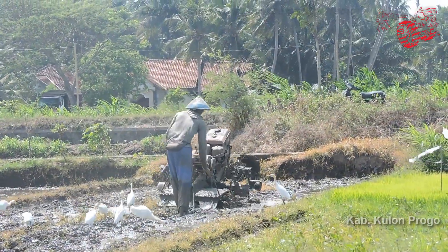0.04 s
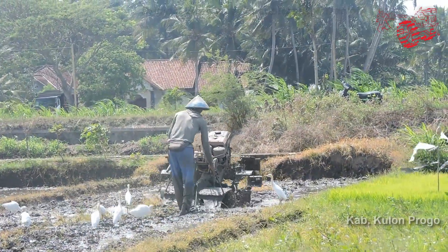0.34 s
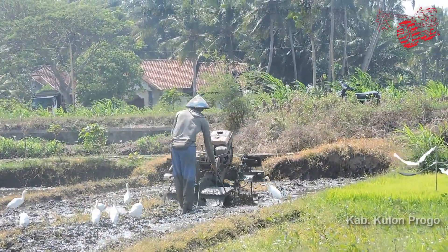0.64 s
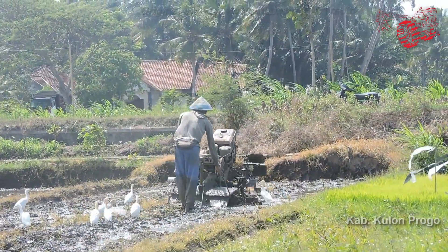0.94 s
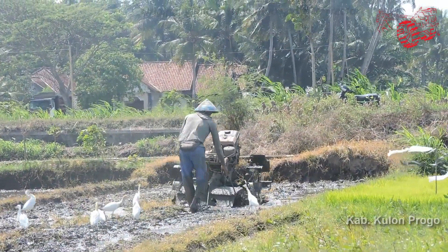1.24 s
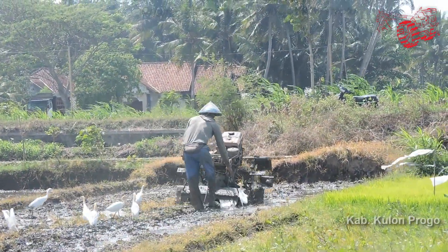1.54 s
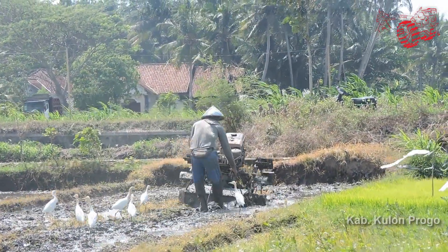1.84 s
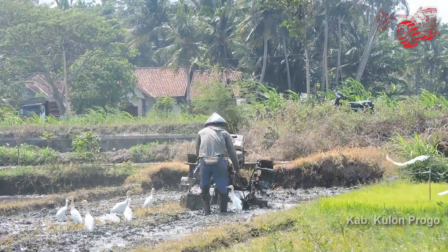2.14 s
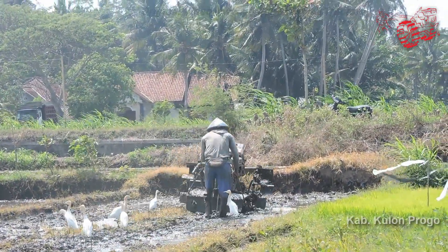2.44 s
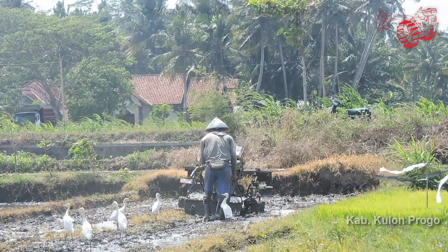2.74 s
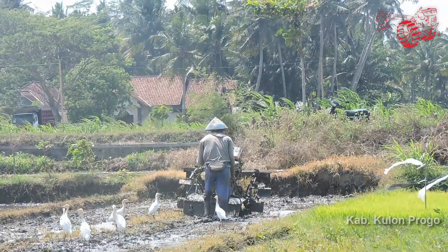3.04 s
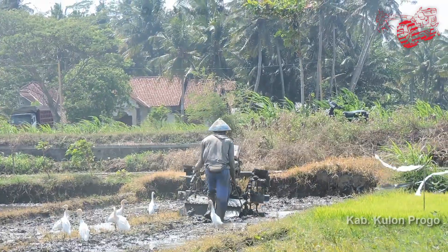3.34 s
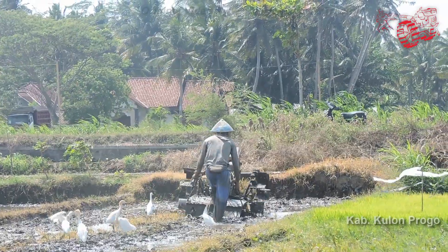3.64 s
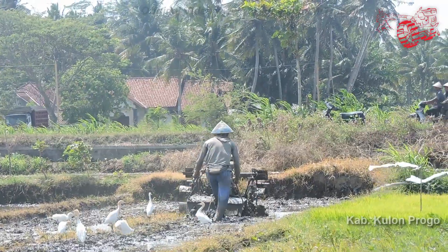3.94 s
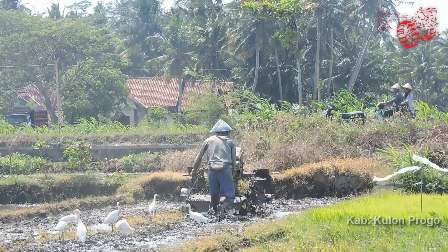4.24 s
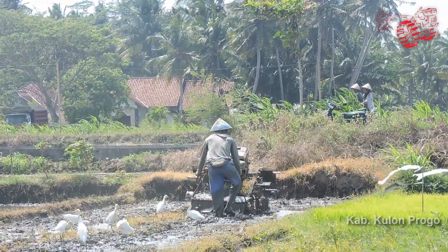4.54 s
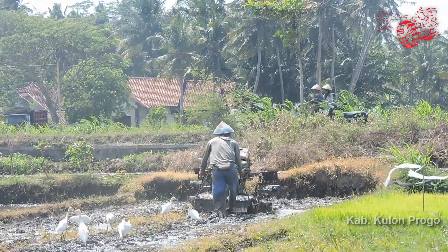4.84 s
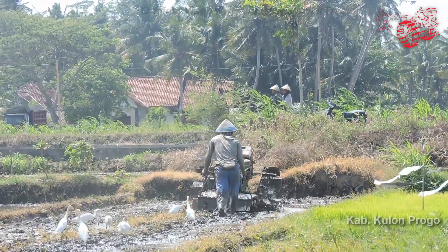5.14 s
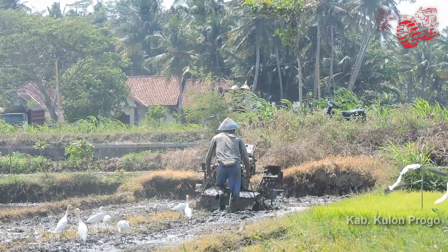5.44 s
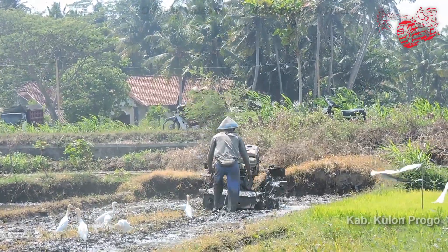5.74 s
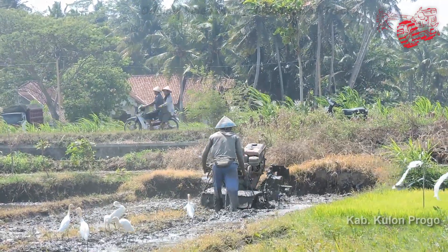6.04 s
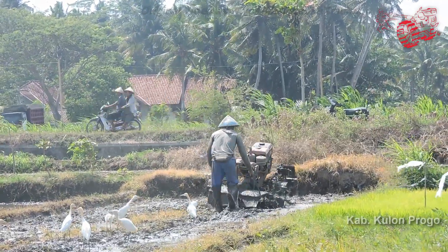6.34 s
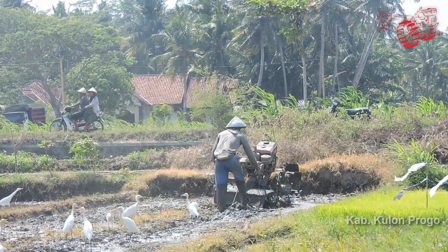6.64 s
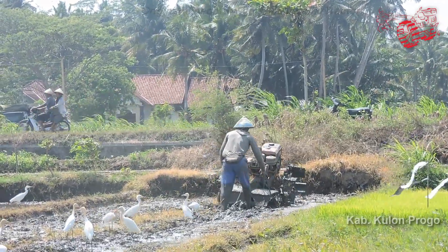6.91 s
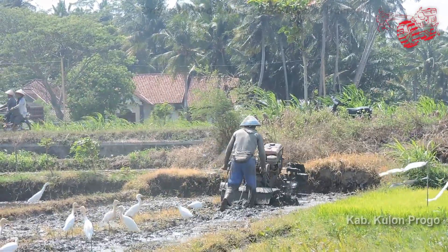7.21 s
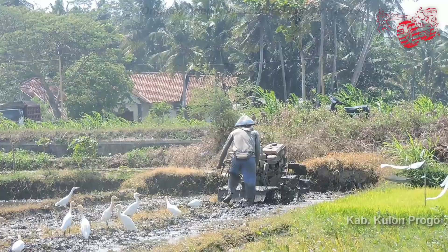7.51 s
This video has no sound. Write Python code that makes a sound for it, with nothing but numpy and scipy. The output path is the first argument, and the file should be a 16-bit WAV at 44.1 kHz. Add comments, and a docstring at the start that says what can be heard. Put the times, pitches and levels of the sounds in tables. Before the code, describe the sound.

Steady chugging and metallic rattling from a small diesel tractor tilling a muddy field, speeding up slightly, while another engine thuds far off.

```python
"""From the start, a breeze rumbles on the microphone while a two-wheel tractor clatters and sprays mud in a
wet rice field, and a second diesel thuds far off. Each cycle of the tractor's one-cylinder diesel is a
knock, an exhaust puff with a sharp crack, then a gulp of air; palms and banks echo the thuds.
The mud's drag swells knock, clatter and spray together. From about 3 s the tractor speeds up and knocks
harder; around 5 s the far engine slows, and just after 7 s the mud drags hardest."""
import sys
import numpy as np
from scipy import signal
from scipy.fft import rfft, irfft, next_fast_len
from scipy.io import wavfile
from scipy.ndimage import map_coordinates

SR = 44100
rng = np.random.default_rng(int(sys.argv[2]) if len(sys.argv) > 2 else 0)


def unload_wav(signal):
    """Save mono or channel-first audio to the path in sys.argv[1] as 16-bit WAV at rate SR, clipped to [-1, 1]."""
    wavfile.write(
        sys.argv[1],
        SR,
        np.round(np.clip(np.atleast_2d(signal).T, -1, 1) * 32767).astype(np.int16),
    )


N = 338247
TIME = np.arange(N) / SR
LOW_SPEED_PER_S = 15  # "extra speed" below means firings per second above this

# tone of gears, tines (the digging blades) and mud: (frequency [Hz], level [dB])
CLATTER_SPECTRUM = [(400, 1.5), (600, -1), (1000, -0.5), (1180, -6), (1450, 3), (2000, 1.5), (2400, 1),
                    (2900, 2), (3500, -4), (4100, -8.5), (4800, -6.5), (7500, -13.5), (10000, -20.5),
                    (12500, -27), (15500, -54)]
# how quickly splashes and pitch flutter: (flutter rate [Hz], level [dB])
FLUTTER_SPECTRUM = [(2, 4), (4, 8), (8, 8), (30, -12), (200, -35), (1000, -90)]


def from_db(db):
    """Turn decibels into a factor to multiply by."""
    return 10 ** (np.asarray(db) / 20)


def rms_one(x):
    """Scale a signal so that its average size (rms) is 1."""
    return x / np.sqrt(np.mean(x ** 2) + 1e-20)


def in_time(rows):
    """Each column of a table over time, as one value per sample."""
    seconds, *columns = np.transpose(rows)
    return [np.interp(TIME, seconds, column) for column in columns]


def noise(spectrum, channels=1):
    """Unrelated noises with the given spectrum; rms 1."""
    hz, db = np.transpose(spectrum)
    size = next_fast_len(N)
    grid = np.maximum(np.fft.rfftfreq(size, 1 / SR), 1)
    low_cut = np.minimum(grid / hz[0], 1) ** 2
    gain = low_cut * from_db(np.interp(np.log(grid), np.log(hz), db))
    white = rng.standard_normal((channels, size))
    return rms_one(irfft(rfft(white) * gain, size)[:, :N])


def resonance(x, hz, width_hz):
    """Ring at one pitch; a smaller width rings longer."""
    r = np.exp(-np.pi * width_hz / SR)
    feedback = [1, -2 * r * np.cos(2 * np.pi * hz / SR), r * r]
    return signal.lfilter(np.array([1, 0, -1]) * (1 - r * r) / 2, feedback, x)


def pan(x, left_db):
    """Make the left side louder than the right by left_db."""
    return x * from_db(np.array([[.5], [-.5]]) * left_db)


def crank(speed, start_cycle):
    """A turning engine: cycles done so far, and firings per second."""
    rate, = in_time(speed)
    return start_cycle + np.cumsum(rate) / SR, rate


def stroke(engine, share, spread_db, jitter_ms):
    """Time in ms from the nearest pass of a point (share) in the cycle, and that pass's random strength."""
    cycles, rate = engine
    nearest = np.round(cycles - share)
    chance = rng.standard_normal((200, 2))[nearest.astype(int) + 2]
    ms = 1000 * (cycles - share - nearest) / rate
    return ms + jitter_ms * chance[:, 0], from_db(spread_db * chance[:, 1])


def burst(engine, share, rise_ms, decay_ms, spread_db, jitter_ms):
    """Rise and fall of a blow that comes once a cycle; rms 1."""
    ms, strength = stroke(engine, share, spread_db, jitter_ms)
    return rms_one(strength * np.exp(np.minimum(ms, 0) / rise_ms - np.maximum(ms, 0) / decay_ms))


def effort_db(engine, base_db, per_load, per_speed):
    """Level of a sound that follows the mud's drag and the engine's extra speed."""
    # load on the engine as the tines bite and slip: (time [s], load [dB])
    load = [(0, -4), (.29, -5), (.56, -1.5), (.93, -4), (1.16, -2.5), (2.05, -2.5), (2.42, -0.9),
            (2.63, -3.5), (3.45, -3), (3.66, 0), (3.97, -3), (4.27, -4), (4.5, -1), (5.05, -2), (7.0, -0.4),
            (7.27, 3), (7.52, -2.3), (7.67, 0)]
    return base_db + per_load * in_time(load)[0] + per_speed * (engine[1] - LOW_SPEED_PER_S)


def steel_ring(force, modes, engine):
    """A struck steel part rings at its own pitches (modes), in a new mix each firing."""
    out = np.zeros(N)
    for k, (hz, width_hz, db, per_speed_db) in enumerate(modes):
        _, strength = stroke(engine, share=.8, spread_db=1.4, jitter_ms=0)
        gain = strength * from_db(db + per_speed_db * (engine[1] - LOW_SPEED_PER_S))
        out += (-1) ** k * resonance(gain * force, hz, width_hz)
    return rms_one(out)


def thuds(engine, puffs, booms, spread_db, jitter_ms):
    """Each gas puff swings the air pressure both ways and makes pipe and silencer boom."""
    pulses = np.zeros(N)
    for share, pressure, width_ms in puffs:
        ms, strength = stroke(engine, share, spread_db, jitter_ms)
        pulses += pressure * strength * ms / width_ms * np.exp(-.5 * (ms / width_ms) ** 2)
    return pulses + sum(from_db(db) * resonance(pulses, hz, width) for hz, width, db in booms)


def wind():
    """A breeze buffets the microphone in slow gusts."""
    # how quickly the gusts change: (rate [Hz], level [dB])
    gusting = [(1, 39), (4, -30), (12, -36), (60, -90)]
    # tone of the breeze: (frequency [Hz], level [dB])
    spectrum = [(12, -12), (22, -2.5), (54, 1), (112, -2.5), (300, -15), (430, -19), (600, -62),
                (2000, -54)]
    gusts = from_db(1.2 * noise(gusting, channels=2))
    return pan(from_db(-27.2) * gusts * noise(spectrum, channels=2), left_db=-2.8)


def rumble():
    """A steady low noise lies under the engines."""
    # tone of the rumble: (frequency [Hz], level [dB])
    spectrum = [(25, -24), (60, -7), (110, -5.5), (170, -0.5), (260, -3), (315, -1.5), (360, -5.5),
                (430, -5), (560, -19), (900, -17.5), (3000, -63)]
    return from_db(-34.5) * noise(spectrum)[0]


def clatter(engine):
    """Gears, tines and mud make a grainy wash that swells each firing; loose parts tick on the frame."""
    # ringing of frame and mudguards: (pitch [Hz], width [Hz], level [dB], change per extra speed [dB])
    frame_modes = [(935, 25, 0, 1.3), (1430, 145, 0, -0.5), (1788, 33, 4, .5), (1965, 24, 1.5, 2),
                   (2220, 33, -9.5, 0.5), (2756, 160, -2.5, -1)]
    swell = 0.5 + 0.17 * burst(engine, share=0.1, rise_ms=16, decay_ms=8.3, spread_db=4, jitter_ms=1.3)
    ticks = (rng.random(N) < 350 / SR) * rng.standard_normal(N)
    wash = from_db(-.5) * noise(CLATTER_SPECTRUM)[0]
    ringing = from_db(-4.5) * steel_ring(ticks, frame_modes, engine)
    return rms_one(swell) * (wash + ringing)


def clinks(per_s=90, low_hz=2600, high_hz=8000, pitches=14):
    """Grit and loose fittings tick at random on the steel wheels and tines."""
    out = np.zeros(N)
    for hz in np.geomspace(low_hz, high_hz, pitches):
        hits = rng.random(N) < per_s / pitches / SR
        strength = from_db(4 * np.clip(rng.standard_normal(N), -2, 2))
        out += resonance(hits * strength + 1e-18, hz, width_hz=110) * low_hz / hz
    return rms_one(out)


def spray(engine):
    """Wet mud flies off the wheels and tines in uneven splashes, spread wide."""
    # bigger throws of mud: (time [s], half length [s], level change [dB])
    clods = [(0.727, .06, 8.5), (1.196, 0.061, 7), (2.29, 0.072, 6), (7.28, .12, -0.5)]
    # hiss of flying mud: (frequency [Hz], level [dB])
    spectrum = [(2000, -8), (4500, -1), (5400, -3.5), (6500, 3), (7600, -3), (8800, -1.5), (9500, -3),
                (10500, -.7), (12000, -6), (14000, -9), (15000, -14), (16000, -22)]
    clods_db = sum(db * np.exp(-((TIME - s) / length) ** 2) for s, length, db in clods)
    splashes = from_db(1.7 * noise(FLUTTER_SPECTRUM)[0] + clods_db)
    level = from_db(effort_db(engine, base_db=-50, per_load=.88, per_speed=-.6))
    return level * splashes * noise(spectrum, channels=2)


def far_engine():
    """Only the thuds of the second diesel carry this far."""
    # its speed: (time [s], firings [per s])
    speed = [(0.0, 20.997), (0.58, 20.708), (1.35, 20.811), (2.38, 20.647), (2.75, 21.485), (3.07, 22.063),
             (3.5, 21.381), (3.96, 20.689), (4.5, 20.81), (4.94, 20.864), (5.3, 19.612), (5.66, 18.216),
             (6.2, 18.021), (6.79, 17.666), (7.67, 17.833)]
    # its gas puffs: (point in cycle [0-1], pressure [relative], half width [ms])
    puffs = [(.006, -.45, 1.08), (.013, .19, 1.55), (.274, -.173, 1.12), (.55, .036, 2.5),
             (.713, .097, 1.25)]
    # booms of its exhaust: (pitch [Hz], width [Hz], level [dB])
    booms = [(154, 15, -3.5), (253, 33, -6.7), (305, 12, -.6), (423, 12, -3.9)]
    # its loudness through the trees: (time [s], level [dB])
    level = [(0, 1.5), (1.2, 2.5), (1.8, 0.1), (2.5, 2), (3.2, 1.5), (4, -2), (4.7, 1), (5.8, -1.3),
             (6.6, -1.5), (7.67, -2)]
    engine = crank(speed, start_cycle=.515)
    return thuds(engine, puffs, booms, spread_db=.5, jitter_ms=.04) * from_db(in_time(level)[0])


def knock(engine):
    """Burning fuel hammers the block a quarter cycle before the exhaust; piston and bearings slap next."""
    # metal hitting metal: (point in cycle [0-1], level [dB], timing scatter [ms])
    contacts = [(.722, -8, .05), (.740, 0, .05), (.765, -9, .3), (.80, -12, .6), (.865, -11, .8)]
    # ringing of block, hood and tank: (pitch [Hz], width [Hz], level [dB], change per extra speed [dB])
    block_modes = [(946, 49, 6, -1.3), (1019, 114, -2, 2), (1390, 29, 6.5, -1.5), (1606, 140, 1.5, -0.5),
                   (1788, 40, 6, 0.3), (1954, 55, -2.5, 2.5), (2205, 85, 0, 1.5), (2810, 130, 6, 1),
                   (3043, 78, 7, 0.5), (3750, 480, -18, 6)]
    # rasp of the knock: (frequency [Hz], level [dB])
    rasp = [(400, 17), (700, 0), (1200, 3.5), (1600, 6), (3200, 15.5), (4100, 7.5), (6500, 1),
            (10000, -6.5), (12500, -9), (15500, -35)]
    taps = np.zeros(N)
    for share, db, scatter_ms in contacts:
        ms, strength = stroke(engine, share, spread_db=.7, jitter_ms=scatter_ms)
        taps += from_db(db) * strength * np.exp(-.5 * (ms / 0.044) ** 2)
    blow = burst(engine, share=.738, rise_ms=1.0, decay_ms=5.5, spread_db=1.2, jitter_ms=.3)
    force = rms_one(taps) + from_db(-5.5) * blow * rng.standard_normal(N)
    return from_db(-6) * steel_ring(force, block_modes, engine) + from_db(-12) * blow * noise(rasp)[0]


def crack(engine):
    """The first jet of gas hisses through the exhaust valve; frame and wet ground scatter the sound."""
    # tone of the jet: (frequency [Hz], level [dB])
    spectrum = [(400, -1), (900, -6), (1500, 0), (3000, 0), (4500, -3), (7000, -2), (8500, -4.5),
                (10500, -4), (12000, -8), (14000, -8.5), (15000, -12), (16000, -20)]
    # loudness of the jet: (time [s], level [dB])
    level = [(0, 2), (.9, 0), (1.3, 1.5), (2.7, -2), (3.5, 2.5), (4.2, 0.5), (5, -4.5), (6, -2.5), (6.7, 1),
             (7.67, -3)]
    jet = burst(engine, share=.99, rise_ms=1.0, decay_ms=3.2, spread_db=2.4, jitter_ms=.4)
    hiss = from_tractor(noise(spectrum)[0]) + from_db(-3) * noise(spectrum, channels=2)
    return from_db(-12.5 + in_time(level)[0]) * jet * hiss


def tailpipe(engine):
    """Every jet of gas sets the pipe ringing at several pitches, each with a new strength."""
    # extra fuel sharpens the exhaust as the engine gathers speed: (time [s], fuel [0-1])
    fuel_curve = [(0, 0), (2.8, 0.44), (3.15, 1), (3.7, 0.89), (4.0, 0.96), (4.6, 0.19), (5.3, 0.19),
                  (7.67, 0)]
    # the pipe's bark:
    # (pitch [Hz], width [Hz], level [dB], change per extra speed [dB], change at full fuel [dB])
    bark = [(1462, 220, -15, 0.5, 7), (1880, 133, -22, 4, 9.5), (2846, 260, -10, -1.5, -4),
            (4610, 310, -17, 0.5, 1), (5680, 250, -29, 6, 16), (6840, 350, -17, -2.5, 10)]
    # a high ping that rises as the gas gets hotter: (time [s], pitch [Hz], level [dB])
    ping_curve = [(0, 5800, -12), (1.2, 5750, -18), (2.1, 5800, -13), (2.7, 5900, -16), (3.3, 6350, -6),
                  (4.5, 6200, -9), (5.4, 6100, -9), (6, 6000, -9), (6.6, 5900, -5), (7.1, 5950, -10),
                  (7.67, 6050, -12)]
    # a bright edge, heard once the pipe points at the listener: (time [s], pitch [Hz], level [dB])
    edge_curve = [(0, 3416, -22), (3.4, 3496, -10.5), (4.8, 3600, -11.5), (6, 3756, -7.5), (7.67, 3577, -8)]
    bark_share, ping_share = .995, .985  # points in the cycle
    ping_width_hz, ping_wander_hz, edge_width_hz = 230, 170, 720
    fuel, = in_time(fuel_curve)
    edge_hz, edge_db = in_time(edge_curve)
    ping_hz, ping_db = in_time(ping_curve)
    ping_hz += ping_wander_hz * noise(FLUTTER_SPECTRUM)[0]
    modes = [(bark_share, *mode) for mode in bark]
    modes.append((ping_share, ping_hz, ping_width_hz, ping_db, 0, 0))
    modes.append((bark_share, edge_hz, edge_width_hz, edge_db, 0, 0))
    out = np.zeros(N)
    for share, hz, width_hz, db, per_speed_db, per_fuel_db in modes:
        jet = burst(engine, share, rise_ms=.9, decay_ms=2, spread_db=1.4, jitter_ms=.3)
        swirl = rng.standard_normal(N) + 1j * rng.standard_normal(N)
        # smooth the noisy jet into a fading ring, then shift it up to its pitch
        ring = signal.lfilter([1], [1, -np.exp(-np.pi * width_hz / SR)], jet * swirl)
        ring = signal.sosfilt(signal.butter(2, 2 * width_hz, fs=SR, output="sos"), ring)
        phase = 2 * np.pi * np.cumsum(hz * np.ones(N)) / SR
        tone = rms_one(np.real(ring * np.exp(1j * phase)))
        out += tone * from_db(db + per_speed_db * (engine[1] - LOW_SPEED_PER_S) + per_fuel_db * fuel)
    return out


def exhaust(engine):
    """The near engine chugs as it puffs gas out and gulps air in."""
    # gas puffs: (point in cycle after the exhaust opens [0-1], pressure [relative], half width [ms])
    puffs = [(.001, .236, 1.26), (.153, .082, 1.85), (.224, -.029, .77), (.305, -.11, .87),
             (.576, -.066, 1.12)]
    # booms of pipe and silencer: (pitch [Hz], width [Hz], level [dB])
    booms = [(117, 17, -1.5), (156, 12, .5), (232, 44, -4), (303, 41, 6.7), (415, 46, 5.5)]
    # the exhaust swings toward the listener as the tractor turns: (time [s], level [dB])
    level = [(0, -0.1), (2.5, 0.1), (4, 0.4), (5.6, 0), (6.4, 1.9), (7.67, 1.1)]
    return thuds(engine, puffs, booms, spread_db=.9, jitter_ms=.08) * from_db(in_time(level)[0])


def palms(x, fade_s, dull_hz):
    """Trunks and banks send back many weak, dull echoes that fall by 60 dB in fade_s."""
    size = SR // 2
    age = np.arange(size) / SR
    echoes = (rng.random(size) < 400 / SR) * rng.standard_normal(size)
    echoes *= from_db(-60 * age / fade_s) * (age > .02)
    padded = np.pad(x, (size, 0), "reflect")
    tail = signal.fftconvolve(padded, echoes / np.linalg.norm(echoes))[size:size + N]
    return signal.sosfilt(signal.butter(2, dull_hz, fs=SR, output="sos"), tail)


def hard_firings(firing_s=.06):
    """Some firings hit harder: changes to knock and crack in dB, each lasting one firing."""
    # the hard hits: (time [s], knock change [dB], crack change [dB])
    hits = [(0.429, -4, 3), (0.76, 0, 3), (0.895, 0, 4), (0.96, 0, 3), (3.21, 2.5, 1), (3.275, 0.5, 5),
            (3.468, 0, 3.5), (3.528, -0.5, 4.5), (3.655, 3, 0), (3.719, 2, 0), (4.51, -1, 5.5),
            (5.689, 3.5, 1), (6.805, 0, 3.5), (7.158, 2, -4), (7.402, 3, -3)]
    return sum(np.outer(change_db, abs(TIME - s) < firing_s / 2) for s, *change_db in hits)


def clanks(rise_ms=.35, decay_ms=2.8):
    """Now and then a jet catches one pitch of the tailpipe squarely."""
    # the loudest clanks: (time [s], pitch [Hz], peak level [dB])
    hits = [(.434, 4750, -28), (.501, 5770, -25), (.568, 2660, -34), (.766, 5300, -29),
            (2.227, 2910, -22.5), (2.294, 2700, -19.5), (2.426, 4800, -29), (3.285, 6300, -20),
            (3.539, 5660, -29), (4.512, 6100, -22), (5.344, 5800, -17), (6.344, 2775, -24),
            (6.518, 5950, -17.5), (7.345, 5840, -27)]
    out = np.zeros(N)
    age = np.arange(SR // 20) / SR
    shape = (1 - np.exp(-1000 * age / rise_ms)) * np.exp(-1000 * age / decay_ms)
    for s, hz, db in hits:
        start = int(s * SR)
        out[start:start + len(age)] += from_db(db) * shape / shape.max() * np.sin(2 * np.pi * hz * age)
    return out


def from_tractor(x):
    """The microphone's right side lies farther from the tractor and hears it later."""
    # left-to-right delay as the tractor moves across: (time [s], delay [ms])
    delay = [(0, .048), (2, .062), (4, .082), (5.5, .094), (7.67, .107)]
    lag_ms, = in_time(delay)
    right = map_coordinates(x, [np.arange(N) - lag_ms * SR / 1000], order=3, mode="nearest")
    return np.array([x, right])


def scene():
    """Mix both engines, the mud, the echoes and the breeze in stereo."""
    # speed of the near engine: (time [s], firings [per s])
    speed = [(0.0, 14.906), (0.52, 15.059), (2.92, 15.067), (4.36, 16.835), (5.4, 17.002), (7.67, 16.924)]
    engine = crank(speed, start_cycle=.4723)
    hard_knock_db, hard_crack_db = hard_firings()
    knock_db = effort_db(engine, base_db=-31.5, per_load=1.1, per_speed=.71) + hard_knock_db
    crack_db = effort_db(engine, base_db=-34.7, per_load=.7, per_speed=.1) + hard_crack_db
    clatter_db = effort_db(engine, base_db=-34, per_load=1.34, per_speed=-1.01)
    rattle = from_db(clatter_db) * (clatter(engine) + from_db(-16) * clinks())
    knocking = from_db(knock_db) * knock(engine)
    metal = rattle + knocking + from_db(crack_db - 0.5) * tailpipe(engine) + clanks()
    chugging = exhaust(engine) + far_engine()
    echoes = from_db(-18) * palms(chugging, fade_s=.5, dull_hz=560)
    bass = pan(from_tractor(chugging + echoes + rumble()), left_db=-0.5)
    banks = from_db(-15) * np.array([palms(metal, fade_s=.12, dull_hz=2800) for side in range(2)])
    wash = from_db(clatter_db - 6) * noise(CLATTER_SPECTRUM, channels=2)  # clatter back from all around
    breeze = wind()
    cracks = from_db(crack_db) * crack(engine)
    return bass + from_tractor(metal) + cracks + spray(engine) + banks + wash + breeze


def record(dry, cutoff_hz=15600):
    """Each side of the microphone colours the sound in its own way; the highest treble is cut steeply."""
    # tone of the two microphone openings: (frequency [Hz], left minus right [dB])
    balance = [(400, -0.5), (650, 3.2), (950, 4.5), (1400, 3.5), (2000, -0.5), (2800, .5), (3700, 2),
               (4800, 1), (9000, 1.3), (11000, 2.2), (13000, 6)]
    hz, db = np.transpose(balance)
    size = next_fast_len(N + SR // 10)
    grid = np.maximum(np.fft.rfftfreq(size, 1 / SR), 1)
    left_db = np.interp(np.log(grid), np.log(hz), db)
    coloured = irfft(pan(rfft(dry, size), left_db), size)[:, :N]
    return signal.sosfilt(signal.ellip(10, .1, 90, cutoff_hz, fs=SR, output="sos"), coloured)


dry = scene()
out = record(dry)
unload_wav(out)
```